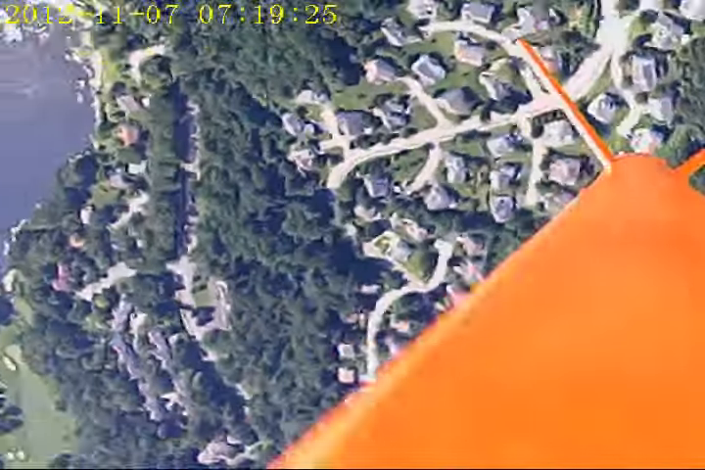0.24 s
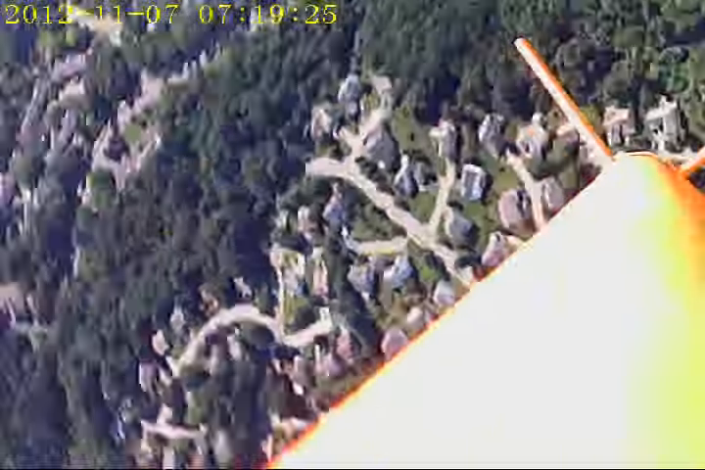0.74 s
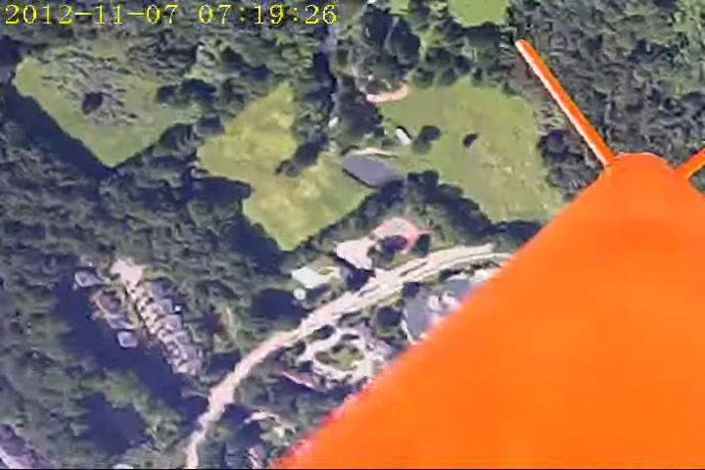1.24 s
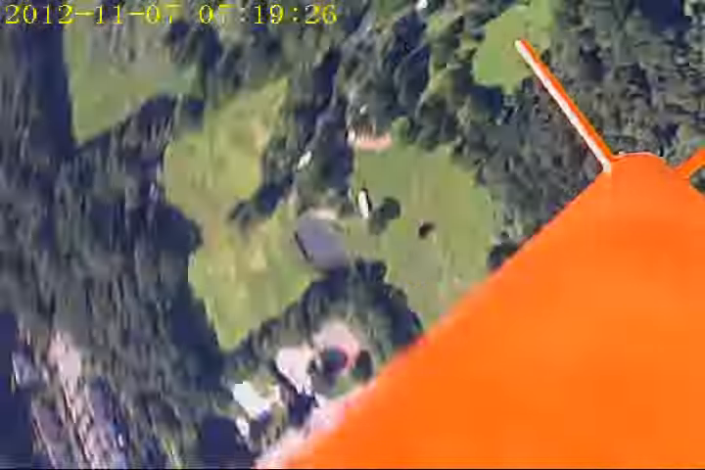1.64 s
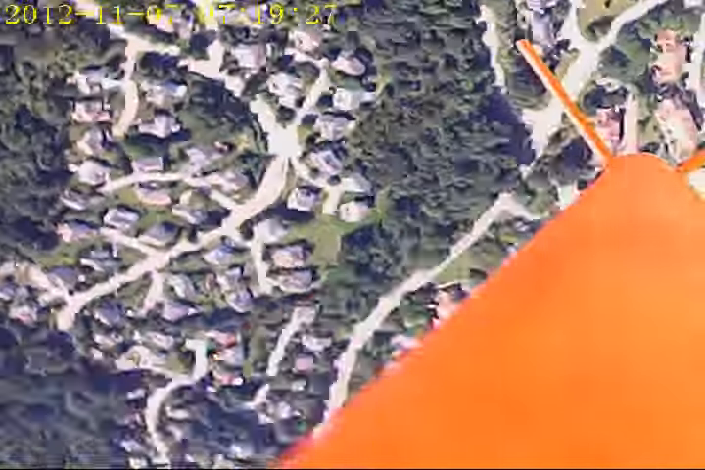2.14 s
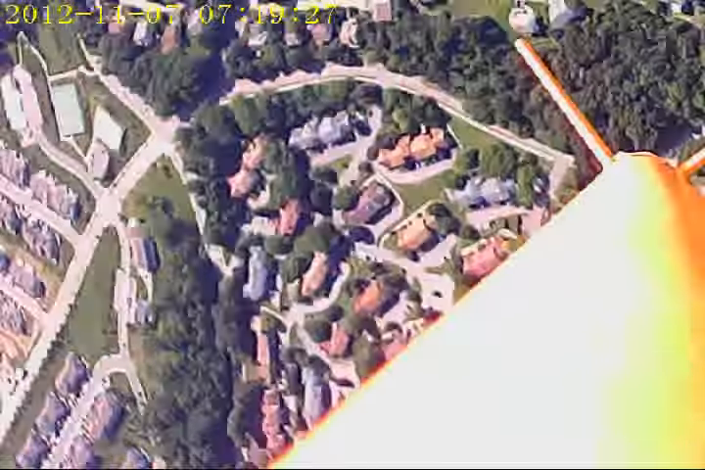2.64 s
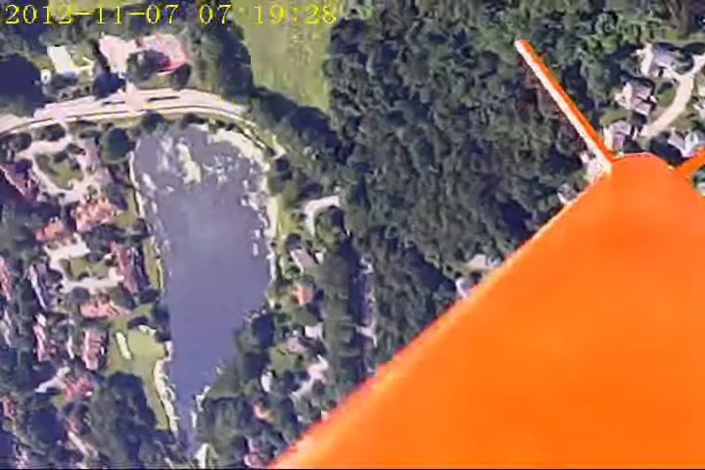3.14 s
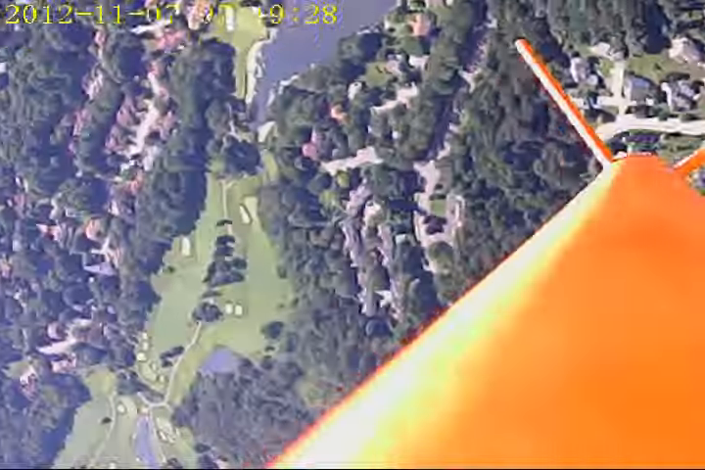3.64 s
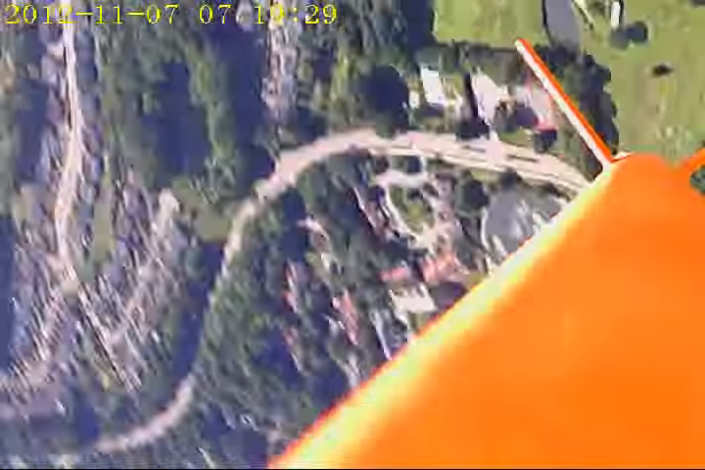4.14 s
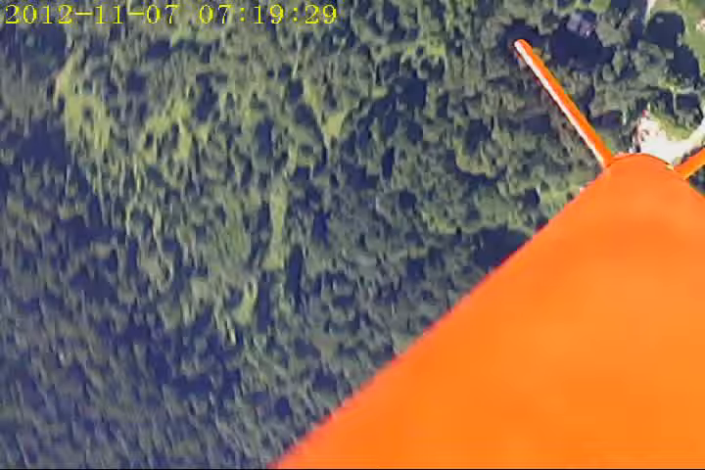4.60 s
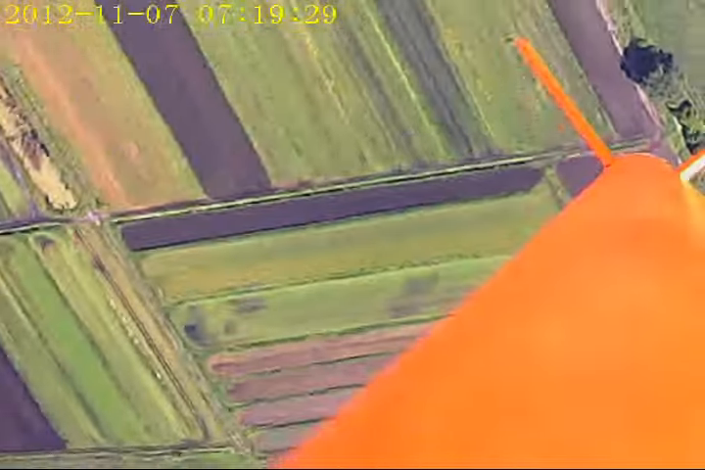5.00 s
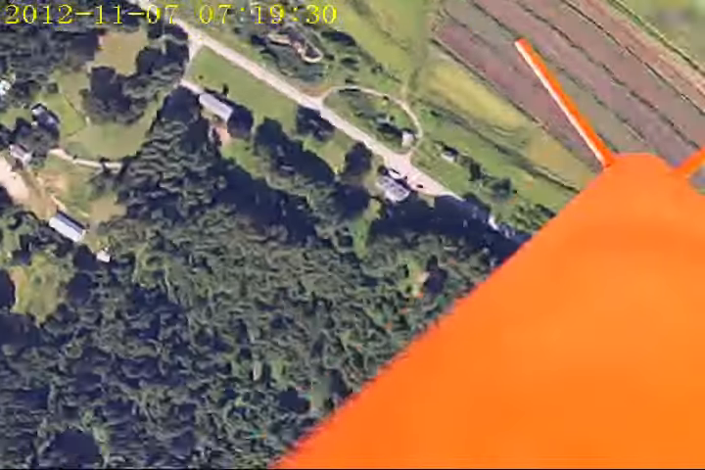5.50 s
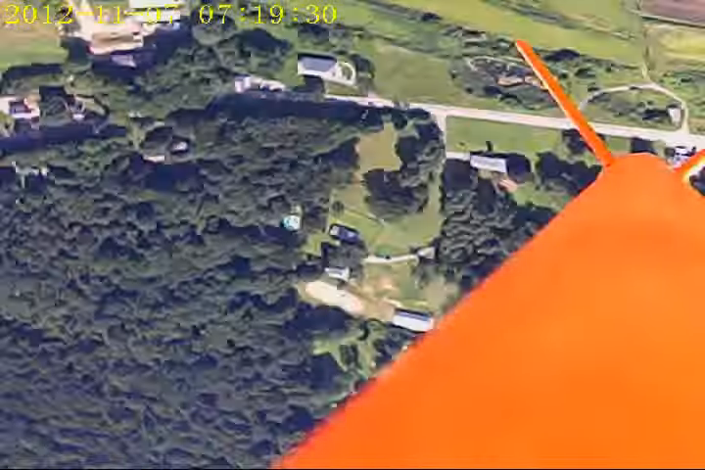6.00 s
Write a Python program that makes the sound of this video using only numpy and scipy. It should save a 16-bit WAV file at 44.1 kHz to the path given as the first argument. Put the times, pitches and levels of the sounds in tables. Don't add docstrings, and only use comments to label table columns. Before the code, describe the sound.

Continuous rough slipstream roar with low thumping gusts and hiss, broken by brief plasticky clicks and clattering bursts against a hollow tube.

```python
import sys
import numpy as np
from scipy import signal
from scipy.fft import rfft, irfft, next_fast_len
from scipy.io import wavfile
from scipy.ndimage import uniform_filter1d

SR = 44100
rng = np.random.default_rng(int(sys.argv[2]) if len(sys.argv) > 2 else 0)


def volts_from_db(level):
    exponent = np.asarray(level, float) / 20
    return 10 ** exponent


def materialize(psi):
    bounded = np.clip(np.atleast_2d(psi).T, -1, 1)
    quanta = np.round(bounded * 32767).astype(np.int16)
    wavfile.write(sys.argv[1], SR, quanta)


N = 276066


def rms_one(x):
    return x / np.sqrt(np.mean(x ** 2) + 1e-20)


def band(x, low_hz, high_hz):
    return signal.sosfilt(signal.butter(2, [low_hz, high_hz], "band", fs=SR, output="sos"), x)


def drift(rate_hz):
    pole = np.exp(-40 * np.pi * rate_hz / SR)
    chance = rng.standard_normal(N // 20 + 2002)
    slow = signal.lfilter([1], [1, -2 * pole, pole ** 2], chance)[2000:]
    return np.interp(np.arange(N) / 20, np.arange(len(slow)), rms_one(slow))


def swells(t_s, peak_s, half_s, db):
    distance = np.abs(t_s - peak_s[:, None]) / half_s[:, None]
    return db[:, None] * np.maximum(1 - distance, 0)


def flow_db(hz):
    # time in seconds, strength in dB,
    # brightness in dB per octave.
    flow = [(0.0, -17.5, 1.5), (0.24, -18.5, 0.5), (0.64, -17, 0.5), (1.46, -18, 0.5), (1.66, -15, 1),
            (1.81, -11, 0), (1.99, -16, 1), (2.32, -17.5, 0), (2.68, -14.5, 0), (2.94, -17.5, 0.5),
            (3.21, -17.5, 0.5), (3.5, -15, -0.5), (4.64, -19, 0.5), (5.11, -17, 0), (5.53, -17.5, 0.5),
            (6.05, -15.5, 0), (6.26, -14, 0)]
    # peak
    # in seconds, half length in seconds, level in dB, pitch in Hz.
    gusts = [(0.473, 0.21, 9.5, 215), (0.53, 0.22, 10, 463), (.1, .08, 2.5, 188.5), (.9, 0.22, 3.5, 189.6),
             (0.763, .04, 2.5, 1150), (1.204, 0.034, 8, 1130), (1.247, .06, 3, 302),
             (1.361, 0.045, -9, 188), (1.597, 0.14, 4, 221), (1.7, 0.084, 3.5, 465), (1.8, .2, 2.5, 5500),
             (1.971, .06, 7.5, 221), (2.068, 0.031, 7, 192), (2.359, 0.061, -5, 352), (2.67, 0.12, -5, 191),
             (2.747, .04, 2.5, 190), (3.1, 0.091, -4.5, 221), (3.621, 0.053, 3.5, 170),
             (3.704, 0.039, 3.5, 1150), (3.776, .05, 0.5, 189), (3.815, .03, -8, 190), (4.01, .05, 2, 1000),
             (4.129, 0.058, 5, 191), (4.52, 0.057, -2.5, 1154), (4.855, 0.34, 6.5, 187),
             (5.0, 0.27, 3, 3450), (5.324, 0.028, 3, 1150), (5.44, .06, -2, 189), (5.648, .1, 4, 189),
             (5.931, .1, 3, 900),
             (1.93, .12, 4.5, 600), (1.88, .1, 2.3, 1300), (3.4, 0.11, 2.5, 1000),
                   (6.15, .15, 4.3, 100), (1.0, 0.13, 2, 700), (5.9, .15, 2, 840), (2.55, .12, 2, 1500),
                   (.6, .08, 3, 600), (.42, .1, 3, 600), (5.15, .2, 2.7, 280), (1.42, .08, 4, 110),
                   (4.27, .08, 3, 1100), (4.39, .05, 2, 1100), (5.96, .03, 3, 1100), (2.2, .12, 6, 35),
                   (4.5, .1, 6, 35)]
    # peak in seconds, half length in seconds, level in dB.
    buffets = [(0.172, 0.082, 5.5), (0.245, 0.061, -4.5), (.56, .12, 9), (1.112, 0.058, 6),
               (1.249, 0.079, 15), (1.377, .07, 7), (1.62, .1, -7), (1.813, 0.13, 3.5), (2.316, 0.14, 7.5),
               (2.551, 0.17, 5.5), (2.748, .05, 10), (2.93, .1, 4.5), (3.303, .07, 6), (3.419, .06, 12),
               (3.544, .07, 7), (3.777, 0.12, 7), (3.961, .09, 13), (4.097, .07, 4.5), (4.255, 0.12, 13),
               (4.845, 0.26, -5.5), (5.287, .13, 12.5), (5.683, .05, -5), (5.843, .1, 5.5),
               (5.907, 0.066, 8.5), (6.004, 0.045, 4.5), (6.119, .1, 9.5), (6.209, .05, 9)]
    roar_hz, rumble_share, hiss_share = 900, 0.4, 0.66
    gust_octaves, buffet_hz, buffet_octaves = 0.88, 61.6, 0.98

    t_s = np.arange(N // 20 + 1) * 20 / SR
    at_s, strength_db, bright_db = np.transpose(flow)
    octaves = np.log2(hz[:, None] / roar_hz)
    share = np.interp(octaves, [-2.7, -1, 1.8, 2], [rumble_share, 1, 1, hiss_share])
    level_db = share * np.interp(t_s, at_s, strength_db)
    level_db += np.clip(octaves, -1, 2) * np.interp(t_s, at_s, bright_db)

    *gust_shape, gust_hz = np.transpose(np.array(gusts))
    gust_reach = np.exp(-(np.log2(hz[:, None] / gust_hz) / gust_octaves) ** 2)
    level_db += gust_reach @ swells(t_s, *gust_shape)

    buffet_reach = np.exp(-(np.log2(hz[:, None] / buffet_hz) / buffet_octaves) ** 2)
    level_db += buffet_reach * swells(t_s, *np.transpose(buffets)).sum(axis=0)
    return t_s, level_db - level_db.mean(axis=1, keepdims=True)


def slipstream(eddy_db, patchy_db):
    # frequency in Hz, level in dB per Hz.
    air_colour = [(20, -17.5), (50, -1), (110, -2), (200, 0.5), (800, -4), (1500, -6.5), (2400, -21.5),
                  (4250, -29),
                  (4650, -32.5), (5950, -30), (6300, -36.5), (7500, -40), (7900, -44), (8300, -82.5)]

    edges_hz = 16 * 2 ** (np.arange(29) / 3)
    centres_hz = np.sqrt(edges_hz[1:] * edges_hz[:-1])
    t_s, levels_db = flow_db(centres_hz)
    white = rng.standard_normal((2, N + SR))
    eddies = drift(40) + 0.67 * drift(12)
    air = np.zeros(N)
    for k, centre_hz in enumerate(centres_hz):
        level_db = np.interp(np.arange(N) / SR, t_s, levels_db[k])
        treble = np.clip(np.log(centre_hz / 500) / np.log(8), 0, 1)
        level_db += eddy_db * treble * eddies + patchy_db * drift(10.4)
        air += volts_from_db(level_db) * band(white[k % 2], edges_hz[k], edges_hz[k + 1])[SR:]

    colour_hz, colour_db = np.transpose(np.array(air_colour))
    size = next_fast_len(N)
    hz = np.arange(1, size // 2 + 2) * SR / size
    gain = volts_from_db(np.interp(np.log(hz), np.log(colour_hz), colour_db))
    return rms_one(irfft(rfft(air, size) * gain, size)[:N])


def add(out, at_s, hz, level_db, rough_hz, rise_s, t60_s):
    lead_s = 0.0004
    t_s = np.arange(SR // 30) / SR
    rise = np.minimum(t_s / rise_s, 1) ** 2
    decay = volts_from_db(-60 * np.maximum(t_s - rise_s, 0) / t60_s)
    chance = rng.standard_normal((len(at_s), len(t_s)))
    wander_hz = rough_hz * np.sqrt(5) * uniform_filter1d(chance, size=5, axis=1)
    cycles = np.cumsum(np.reshape(hz, (-1, 1)) + wander_hz, axis=1) / SR
    rings = np.sin(2 * np.pi * cycles + 9 * chance[:, :1])
    start = ((np.asarray(at_s) - rise_s - lead_s) * SR).astype(int)
    at = start[:, None] + np.arange(len(t_s))
    np.add.at(out, np.clip(at, 0, N), np.sqrt(2) * volts_from_db(level_db)[:, None] * rise * decay * rings)


def contacts(at_s, knock_db, snap_db, snap_hz, tick_db, tick_hz, length=1):
    # roughness in Hz, gain in dB, rise in seconds, t60 in seconds.
    bodies = [
        (362, 6, 0.00101, 0.013),
        (920, 3.5, .0018, 0.0092),
        (1160, 2, 0.0017, 0.011),
    ]
    knock_hz = 1872
    out = np.zeros(N + 1)
    pitches_hz = (knock_hz, snap_hz, tick_hz)
    levels_db = (knock_db, snap_db, tick_db)
    for hz, level_db, (rough_hz, gain_db, rise_s, t60_s) in zip(pitches_hz, levels_db, bodies):
        add(out, at_s, hz, level_db + gain_db, rough_hz, length * rise_s, length * t60_s)
    return out[:N]


def jitter(level_db, spread_db):
    when, knock, snap, tick, snap_pitch, tick_pitch = rng.random((150, 6)).T
    return contacts(when * N / SR,
                    knock_db=level_db + spread_db * knock,
                    snap_db=level_db - 9.0 + spread_db * snap, snap_hz=2600 + 1600 * snap_pitch,
                    tick_db=level_db - 8.0 + spread_db * tick, tick_hz=4500 + 2800 * tick_pitch)


def strikes(rows, length=1):
    housing_from_hz = 4500
    part_less_db, housing_less_db = 5, 10
    at_s, knock_db, click_db, click_hz = np.transpose(rows)
    part, housing = rng.random((len(at_s), 2)).T
    high = click_hz > housing_from_hz
    return contacts(at_s, knock_db,
                    snap_db=click_db - part_less_db * high,
                    snap_hz=np.where(high, 2800 + 1400 * part, click_hz),
                    tick_db=click_db - housing_less_db * ~high,
                    tick_hz=np.where(high, click_hz, 4800 + 1300 * housing), length=length)


def rattle():
    # time in seconds, tube knock in dB, click in dB, click pitch in
    # Hz.
    ticks = [(.0289, -19, -27, 3600), (.426, -28, -29.5, 5540), (.5762, -24, -31, 3100),
             (.8311, -21, -29, 3900), (.9349, -20, -20, 2500), (2.22, -29.5, -28, 3980),
             (2.3646, -39, -28, 4200), (2.594, -22, -28, 3500), (2.6634, -27, -29, 3400),
             (2.7285, -22, -23, 4200), (2.999, -34, -30, 7040), (3.7041, -23, -33, 2700),
             (3.8974, -20, -35, 6960), (3.9246, -18, -28, 4200), (4.2, -26, -30, 3700),
             (4.2059, -25, -25, 3800), (4.2808, -19, -33, 7000), (4.327, -32, -30, 3000),
             (4.392, -23, -28, 5170), (4.4082, -26, -33, 6400), (4.4465, -16.5, -21, 2600),
             (4.6898, -24, -28, 3140), (5.047, -24, -24, 4230), (5.3925, -20, -26, 3340),
             (5.7864, -39, -28, 6300), (5.8847, -23, -23, 5200), (5.9297, -19, -12.5, 4100),
             (6.007, -17, -24, 2500), (6.0223, -25, -32, 2500), (6.2548, -18, -29, 3560),
             (1.3539, -19, -29, 5540), (1.358, -17, -24, 6100), (1.3611, -15, -16.5, 5100),
               (1.384, -25, -27, 6300), (1.3873, -19, -21, 4900), (1.3983, -28, -26, 5400),
               (1.422, -13, -16.5, 5110), (1.449, -21, -27, 3200), (1.459, -19, -29, 3800),
               (3.971, -19, -28, 3380), (3.973, -23, -26, 3700), (3.986, -15, -22, 3400),
               (3.995, -15, -22, 3680), (4.0109, -14, -20.5, 5800), (4.0204, -16, -23, 5300),
               (4.5414, -13, -29.5, 5800), (4.55, -21, -20, 3400), (4.554, -21, -19, 3210),
               (4.5557, -23, -16, 5900), (4.5613, -13.5, -9.5, 3370), (4.5651, -24, -20, 3400),
               (4.5704, -19, -23.5, 4240), (4.5722, -19, -15.5, 3470), (4.611, -16, -40, 3600),
               (5.8806, -32, -31, 6500), (4.4524, -33, -30, 5800), (1.4322, -31, -34, 3400),
               (1.342, -30, -35, 6000), (2.62, -33, -35, 7000)]
    # time in seconds, tube knock in dB,
    # click in dB, click pitch in Hz.
    cracks = [
        (5.9292, -20, -8, 2800),
        (4.6094, -11, -36, 3300),
        (3.9947, -22, -29, 7000),
        (4.561, -24, -15, 5920),
        (1.422, -16, -21, 3530),
    ]
    # time in seconds, level in dB.
    low_thumps = [
        (4.5575, -8),
        (4.011, -13),
        (1.2, -11),
    ]

    thumps = np.zeros(N + 1)
    at_s, level_db = np.transpose(low_thumps)
    add(thumps, at_s, 857, level_db, rough_hz=60, rise_s=0.004, t60_s=0.045)
    clear = strikes(np.array(ticks))
    return clear + strikes(cracks, length=0.55) + thumps[:N]


def scene():
    air = volts_from_db(-13.0) * slipstream(eddy_db=0.78, patchy_db=1.02)
    return (air + jitter(level_db=-35.5, spread_db=8) + rattle())[None]


def low_pass(x):
    return signal.sosfilt(signal.butter(12, 15850, fs=SR, output="sos"), x)


def record(dry):
    cutoff_hz, offset = 8795, -0.04
    rounded = 1.804 * np.tanh(dry / 1.798)
    narrow = signal.sosfilt(signal.cheby2(16, 70, cutoff_hz, fs=SR, output="sos"), rounded)
    return low_pass(np.clip(narrow + offset, -1, 1))


dry = scene()
out = record(dry)
materialize(out)
```